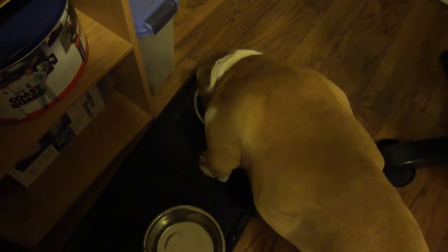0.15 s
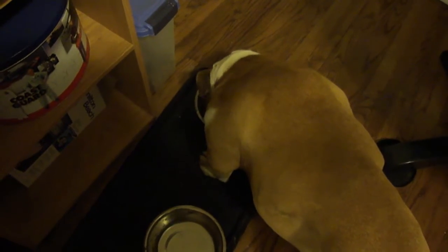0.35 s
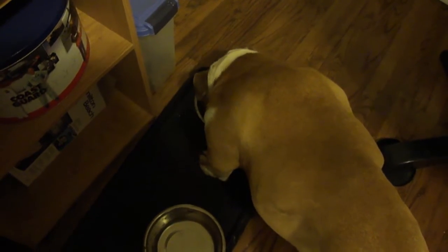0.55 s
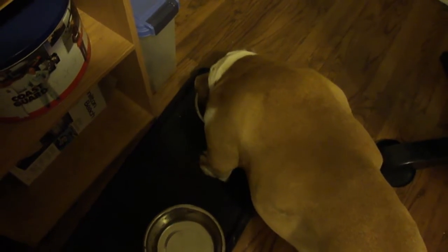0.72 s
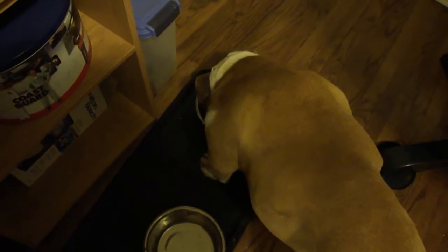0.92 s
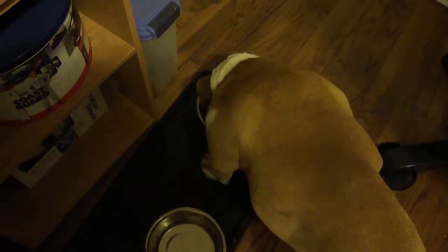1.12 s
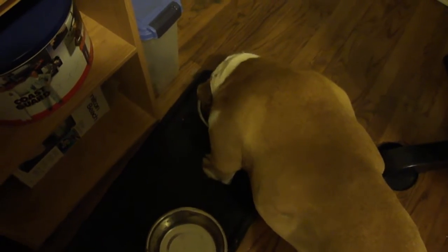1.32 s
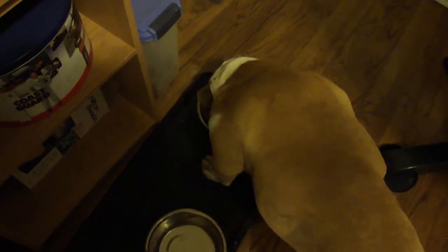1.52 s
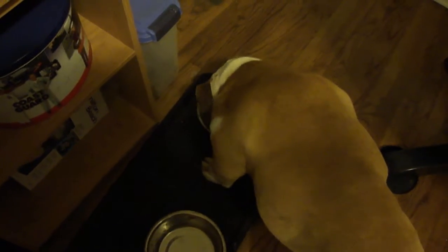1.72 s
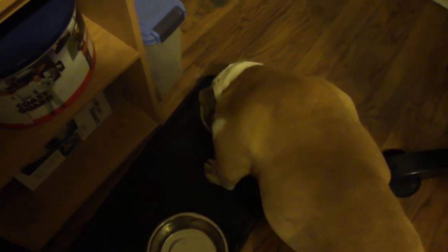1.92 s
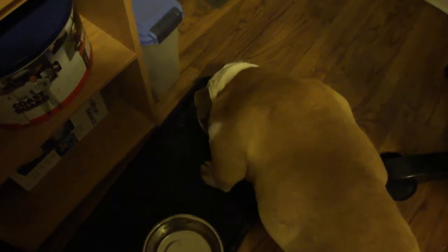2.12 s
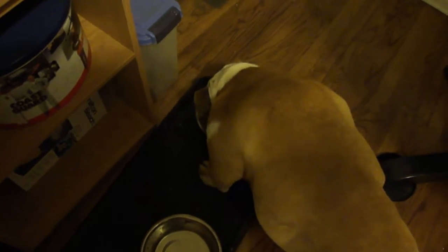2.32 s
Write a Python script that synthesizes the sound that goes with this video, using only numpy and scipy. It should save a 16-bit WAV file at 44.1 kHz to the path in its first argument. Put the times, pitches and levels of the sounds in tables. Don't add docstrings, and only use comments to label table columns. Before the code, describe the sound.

A dog wolfs wet food from a bowl, chomping, smacking and slurping in quick bites indoors

```python
import sys
import numpy as np
from scipy import signal
from scipy.fft import rfft, irfft
from scipy.io import wavfile
from scipy.ndimage import uniform_filter1d

SR = 44100
rng = np.random.default_rng(int(sys.argv[2]) if len(sys.argv) > 2 else 0)


def gain_from_decibels(decibels):
    exponent = np.asarray(decibels, float) / 20
    return 10 ** exponent


def store_pcm(level_fs):
    pcm = np.round(np.clip(level_fs, -1, 1) * 32767).astype(np.int16)
    wavfile.write(sys.argv[1], SR, np.atleast_2d(pcm).T)


N = 110250

# start_s, level_db (peak), pitch_hz, ring_cycles
GULPS = [(0.221, -27.5, 443, 16.4), (0.246, -26, 456, 7.7), (0.315, -10, 372, 4.7), (0.342, -20, 390, 3.9),
         (0.364, -36, 393, 4.5), (0.415, -42, 392, 3.3), (0.566, -23, 439, 3), (0.574, -11.5, 413, 6.3),
         (0.598, -18, 420, 5.1), (0.628, -21.5, 390, 3), (0.648, -22.5, 427, 5.1),
         (0.9135, -13.5, 457, 4.9), (0.94, -23, 560, 5.2), (0.976, -16, 443, 2.5), (0.99, -15, 450, 3),
         (1.03, -23.5, 570, 13.3), (1.057, -23, 400, 3.9), (1.163, -35, 307, 4.5), (1.392, -22, 406, 6.1),
         (1.418, -17.5, 474, 3.7), (1.488, -18, 422.4, 10.7), (1.599, -21.5, 650, 2.7),
         (1.733, -11.5, 425, 5.4), (1.807, -14.5, 726, 9.1), (1.829, -20.5, 539, 11),
         (1.89, -24.5, 572, 19), (2.072, -21, 483, 6.8), (2.103, -15, 366, 4.4), (2.134, -19, 418, 4.4),
         (2.143, -13, 743, 6.4), (2.16, -23.5, 833, 12), (2.185, -24, 530, 5.6), (2.232, -30, 530, 5.8),
         (2.481, -35.5, 434, 3.4)]
# start_s, level_db (peak), pitch_hz, ring_cycles
TONGUE_SLAPS = [(0.107, -37, 953, 12), (0.124, -27, 1026, 7.8), (0.223, -19, 1085, 9.5),
                (0.245, -14.5, 955, 4.2), (0.324, -12, 1065, 9.2), (0.345, -10.5, 1170, 9.5),
                (0.423, -26, 1186, 13), (0.474, -29.5, 1130, 15), (0.527, -20.5, 1300, 6.1),
                (0.556, -17.5, 938, 8), (0.565, -27, 926, 8), (0.575, -14.5, 953, 7.2),
                (0.603, -23, 1070, 7.4), (0.658, -10.5, 990, 7.4), (0.671, -12, 1058, 8.3),
                (0.69, -33, 1130, 13), (0.84, -25, 1140, 8.8), (0.8725, -27, 1001, 14),
                (0.915, -16.5, 987, 7.2), (0.938, -24.5, 1023, 18), (0.977, -23.5, 1110, 17.5),
                (1.015, -16, 1042, 5.5), (1.3, -33, 975, 11), (1.418, -23, 1073, 7.6),
                (1.438, -16, 1065, 5.4), (1.478, -24.5, 1130, 12), (1.498, -16, 1090, 4.9),
                (1.515, -17.5, 1135, 16), (1.719, -18.5, 1073, 14), (1.734, -13, 1056, 7.3),
                (1.758, -23, 1100, 7.8), (1.811, -16, 949, 17.7), (1.851, -21.5, 990, 12),
                (1.893, -25, 1016, 6.2), (2.021, -22, 1013, 7.8), (2.048, -26, 968, 24),
                (2.068, -24, 1008, 18), (2.105, -18.5, 963, 11.5), (2.18, -27.5, 1094, 19),
                (2.226, -26, 928, 14.7), (2.424, -35, 961, 25), (2.479, -40, 953, 13)]
# start_s, level_db (peak), pitch_hz, ring_cycles
SMACKS = [(0.1241, -34, 1600, 7.8), (0.2189, -17, 3250, 13), (0.2463, -21.5, 1650, 15.4),
          (0.2703, -22, 2530, 15), (0.3356, -8.5, 2110, 12.4), (0.346, -35, 1910, 17),
          (0.4673, -40, 3170, 14), (0.4808, -36.5, 2850, 27), (0.5651, -18, 2320, 26),
          (0.5716, -15, 3710, 14.3), (0.6634, -15, 3070, 11), (0.6704, -18, 3026, 21),
          (0.8759, -25.5, 1624, 8.8), (0.8889, -28, 1990, 30), (0.9158, -18.5, 3550, 21),
          (0.9762, -29, 1650, 36), (1.0095, -19, 3580, 18), (1.3877, -12.5, 2920, 20),
          (1.3947, -12.5, 3010, 13), (1.422, -20.5, 2780, 22), (1.435, -28, 1580, 39),
          (1.487, -19, 1560, 17), (1.4955, -16, 2366, 12.5), (1.707, -11.5, 2000, 9.2),
          (1.7344, -17, 3616, 18), (1.8148, -16, 1714, 28), (2.0213, -12, 1990, 8.8),
          (2.035, -29, 1934, 24), (2.0727, -22, 3890, 20), (2.14, -22, 2230, 10), (2.2268, -25, 2026, 17)]
# start_s, level_db (peak),
# pitch_hz, ring_cycles
FURTHER_POPS = [(0.065, -39, 9350, 25), (.1245, -34, 3100, 14), (.1486, -34, 3050, 14), (.205, -31.5, 5800, 22),
                (.345, -26.5, 6160, 56), (.664, -6.5, 1350, 5), (.915, -27, 6190, 40), (.925, -23, 4280, 32),
                (1.376, -37, 3740, 20.), (1.421, -25, 5370, 64), (1.505, -30, 5750, 22), (1.515, -17, 2624, 28),
                (1.545, -25, 2357, 38), (1.929, -32.5, 3030, 18), (2.018, -12.5, 2760, 12.4),
                (2.115, -20.5, 287, 4.8), (2.168, -24, 3720, 12), (2.486, -43, 2920, 10)]
# start_s, level_db (peak), length_s, depth_db (extra for low grains), rise (share of length)
SPRAYS = [(0.106, -59.5, 0.01, 9, .2), (0.123, -51.5, 0.0088, 6.5, 0.088), (0.198, -32, 0.031, -6, 0.5),
          (0.255, -30.5, 0.019, -2, 0.78), (0.3148, -28.5, 0.011, -0.5, 0.1),
          (0.335, -29, 0.012, -0.5, 0.34), (0.472, -35.5, 0.0081, -9, 0.24),
          (0.54, -33.5, 0.018, 3.5, 1.14), (0.563, -18, 0.012, -6.5, 0.69),
          (0.6425, -24, 0.018, -2.5, 0.43), (0.662, -26.5, 0.0085, -4, 0.14), (0.87, -41, 0.022, 1, 0.29),
          (0.912, -22.5, 0.0073, -3, 0.35), (0.968, -25, 0.021, -4, 0.6), (1.003, -35, 0.0068, -5.5, 0.34),
          (1.3855, -26.5, 0.018, -7.5, 0.17), (1.4776, -23.5, 0.031, 2, 0.75),
          (1.563, -37.5, 0.067, 4.5, 1.05), (1.704, -33.5, 0.027, -3.5, 0.16),
          (1.73, -20.5, 0.021, -14.5, 0.54), (1.8013, -22, 0.014, 5, 0.92), (2.0125, -39, 0.031, 1, 0.23),
          (2.066, -33, 0.014, -18, 0.32), (2.0965, -30, 0.031, 0.5, 0.71), (2.154, -34, 0.013, 2, 0.58),
          (2.473, -53.5, 0.016, 10.5, 0.33)]
# pitch_hz, level_db (per Hz)
CRACKLE_SPECTRUM = [(88, -29), (150, -34), (336, -10), (1040, -7), (2330, -9.5), (2990, -10.5),
                    (10900, -30.5), (14100, -65), (22000, -120)]
# pitch_hz, width_hz, level_db
BOWL_RINGS = [(434, 118, -2.5), (553, 60, -2), (990, 31, 6), (1029, 49, -6.5), (1650, 34, -1.5),
              (1990, 26, -2.5), (2540, 980, -33)]
# start_s, level_db, length_s
SHOVES = [
    (0.94, -58, 0.033),
    (1.565, -46.5, .14),
    (1.93, -56, 0.073),
    (2.165, -59.5, 0.11),
]
# delay_s, level_db
ECHOES = [(.0058, -10.5), (.0095, -8.5), (.021, -21)]
# pitch_hz, fade_s
ROOM_FADE = [(150, 0.5), (1040, 0.42), (7280, 0.3)]
# pitch_hz, level_db
HUSH_SPECTRUM = [(15, -50), (25, -21), (144, -10), (343, -5.5), (773, -2.5), (1420, -5), (1660, -5),
                 (2250, -13.5), (10900, -23.5), (14100, -52), (22000, -120)]

GULP_GLIDE, SLAP_GLIDE, SMACK_GLIDE = 0.089, 0.13, 0.017
GULP_DB, SLAP_DB, SMACK_DB, SPRAY_DB = -6.5, -3.5, -5, -5
SWELL, UNSTEADY = 0.2, 0.036
TWIN_S = 0.0096
SLOSH_DB, SLOSH_S = -20, 0.072
CRACKLES_PER_S, CRACKLE_SPREAD_DB = 150, 4.5
GRAIN_CYCLES, DEEP_HZ = 7.07, 2490
BOWL_DB, ROOM_DB, HUSH_DB = -4.5, -4, -52
MAT_HZ, MAT_WIDTH_HZ = 138, 77
EARLIER_DB = -45


def pops(table, glide, gain_db, twin_db):
    out, t = np.zeros(N), np.arange(4096) / SR
    shake = uniform_filter1d(rng.standard_normal((len(table), 4096)), 60, axis=1) * 8
    chance = rng.random((len(table), 2))
    for (start_s, db, pitch_hz, cycles), jitter, (a, b) in zip(table, shake, chance):
        # (delay, pitch ratio, dB)
        pockets = (0, 1, 0), (a, 1.05 + b * 0.15, twin_db), (b, 0.92 - a / 10, twin_db)
        for late, ratio, less_db in pockets:
            hz = pitch_hz * ratio
            u = t * hz / max(cycles, 1)
            bend = 1 + glide * (np.minimum(u, 1.5) - 0.4) + UNSTEADY * jitter
            turns = np.cumsum(hz * bend) / SR
            envelope = (1 - np.exp(-u / SWELL)) * np.exp(-2 * u ** 1.75)
            ring = envelope * np.sin(2 * np.pi * turns)
            level = gain_from_decibels(db + gain_db + less_db)
            add(out, start_s + late * TWIN_S, level * ring / abs(ring).max())
    return out


def crackle():
    bright, deep, t = np.zeros(N), np.zeros(N), np.arange(SR // 2) / SR
    for start_s, db, length_s, depth_db, rise in SPRAYS:
        u = t / max(length_s, 0.002)
        fade = np.exp(-u ** 1.48) + gain_from_decibels(SLOSH_DB) * np.exp(-t / SLOSH_S)
        shape = (1 - np.exp(-u / max(rise, 0.02))) * fade
        add(bright, start_s, gain_from_decibels(db + SPRAY_DB) * shape)
        add(deep, start_s, gain_from_decibels(db + SPRAY_DB + depth_db) * shape)
    out = np.zeros(N)
    for hz in np.geomspace(250, 10800, num=40):
        size_db = CRACKLE_SPREAD_DB * np.minimum(rng.exponential(1, N), 3)
        size = gain_from_decibels(size_db) * rng.standard_normal(N)
        chance = CRACKLES_PER_S * (hz / DEEP_HZ) ** 0.8 / SR
        bursts = size * (rng.random(N) < chance)
        u = t[:1024] * hz / GRAIN_CYCLES
        grain = u * np.exp(-2 * u) * np.sin(2 * np.pi * GRAIN_CYCLES * (u + 0.06 * u ** 2))
        grains = evened(signal.oaconvolve(bursts, grain)[:N])
        deep_share = 1 / (1 + (hz / DEEP_HZ) ** 4)
        level_db = read(CRACKLE_SPECTRUM, hz) - read(CRACKLE_SPECTRUM, 7290.0)
        level = gain_from_decibels(level_db) * np.sqrt(hz / 9300.0) * 0.21
        out += level * grains * (deep_share * deep + (1 - deep_share) * bright)
    return out


def bowl(x):
    rings = sum(gain_from_decibels(db) * resonate(x, hz, width_hz) for hz, width_hz, db in BOWL_RINGS)
    return x + gain_from_decibels(BOWL_DB) * 4 * rings


def shoves():
    push = np.zeros(N)
    for start_s, db, length_s in SHOVES:
        add(push, start_s, gain_from_decibels(db) * np.hanning(round(length_s * SR)))
    rub = resonate(rng.standard_normal(N), MAT_HZ, MAT_WIDTH_HZ)
    rub = resonate(rub, MAT_HZ, 2 * MAT_WIDTH_HZ)
    return push * evened(rub)


def room(x):
    turns_per_s = 9
    angles = 2 * np.pi * (np.arange(N) / SR * turns_per_s + np.arange(3)[:, None] / 3)
    return x + sum(signal.fftconvolve(x * np.sqrt(2 / 3) * np.cos(a), tail())[:N] for a in angles)


def tail():
    taps = np.zeros(SR)
    at = np.arange(200, SR - 20, 20)
    taps[at + rng.integers(0, 20, len(at))] = rng.choice([-1.0, 1.0], len(at))
    hz, t, z = signal.stft(taps, SR, nperseg=256)
    fade = gain_from_decibels(-60 * t / read(ROOM_FADE, hz)[:, None])
    out = signal.istft(z * fade, SR, nperseg=256)[1]
    out = gain_from_decibels(ROOM_DB) * out / np.linalg.norm(out)
    for k, (delay_s, db) in enumerate(ECHOES):
        out[round(delay_s * SR * rng.uniform(0.9, 1.1))] += (-1) ** k * gain_from_decibels(db)
    return out


def hush():
    air = gain_from_decibels(HUSH_DB) * evened(coloured(rng.standard_normal(N), HUSH_SPECTRUM))
    last_bite = evened(bowl(coloured(rng.standard_normal(N), CRACKLE_SPECTRUM)))
    return air + last_bite * gain_from_decibels(EARLIER_DB - 180.0 * np.arange(N) / SR)


def add(mix, start_s, sound):
    part = mix[round(start_s * SR):][:len(sound)]
    part += sound[:len(part)]


def evened(x):
    return x / np.sqrt(np.mean(x ** 2) + 1e-20)


def read(points, hz):
    f, value = np.transpose(points)
    return np.interp(np.log(hz + 1), np.log(f + 1), value)


def coloured(x, spectrum):
    level = gain_from_decibels(read(spectrum, np.fft.rfftfreq(len(x), 1 / SR)))
    return irfft(rfft(x) * level, len(x))


def resonate(x, hz, width_hz):
    r = np.exp(-np.pi * width_hz / SR)
    return signal.lfilter([1 - r, 0, r - 1], [1, -2 * r * np.cos(2 * np.pi * hz / SR), r * r], x)


def scene():
    mouth = pops(GULPS, GULP_GLIDE, GULP_DB, twin_db=-15.5)
    mouth += pops(TONGUE_SLAPS, SLAP_GLIDE, SLAP_DB, twin_db=-10)
    lips = pops(SMACKS, SMACK_GLIDE, SMACK_DB, twin_db=-6.5)
    lips += pops(FURTHER_POPS, SMACK_GLIDE / 2, SMACK_DB, twin_db=-17.5)
    return (room(mouth + lips + bowl(crackle()) + shoves()) + hush())[None]


def roll_off(x):
    return signal.sosfilt(signal.butter(12, 13700, fs=SR, output="sos"), x)


def record(dry):
    thin = signal.sosfilt(signal.butter(2, 110.0, "high", fs=SR, output="sos"), dry)
    edge = signal.firwin(511, 11000, window=("kaiser", 9), fs=SR)
    slot = signal.firwin(511, (13000, 13600), window=("kaiser", 9), pass_zero=False, fs=SR)
    mirrored = thin * (-1.0) ** np.arange(N)
    image = gain_from_decibels(-33) * signal.oaconvolve(mirrored, slot[None], "same")
    mix = signal.oaconvolve(thin, edge[None], "same") + image
    return roll_off(mix)


dry = scene()
out = record(dry)
store_pcm(out)
```